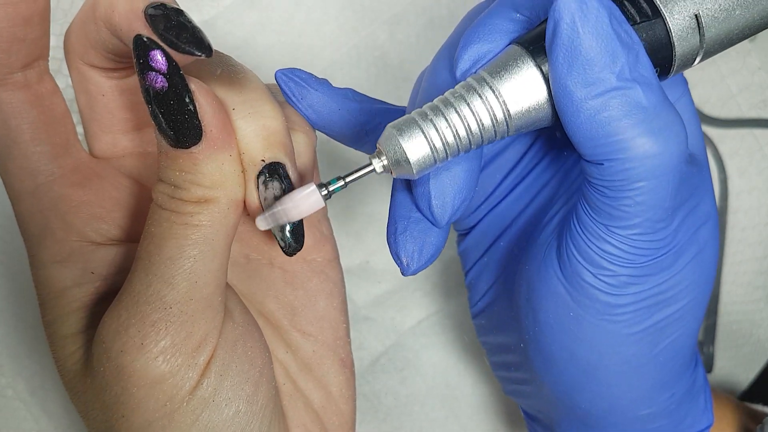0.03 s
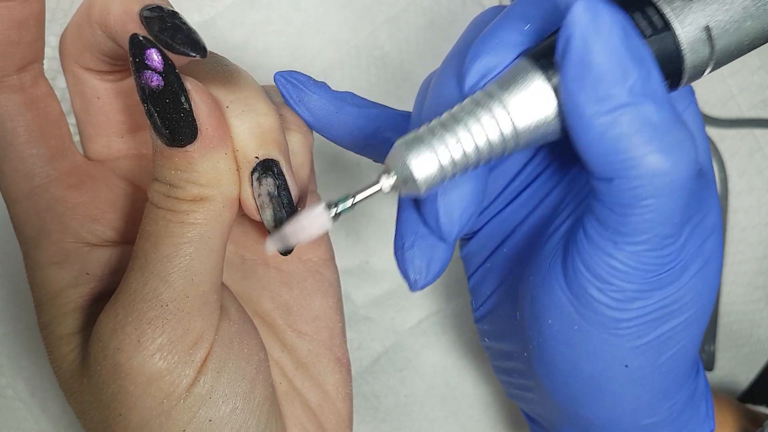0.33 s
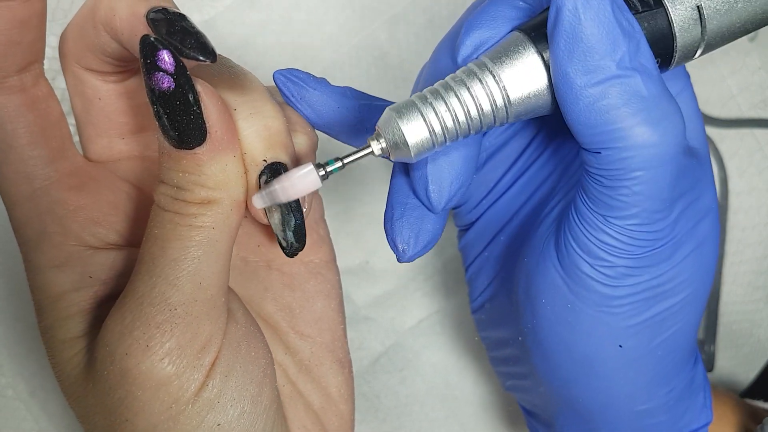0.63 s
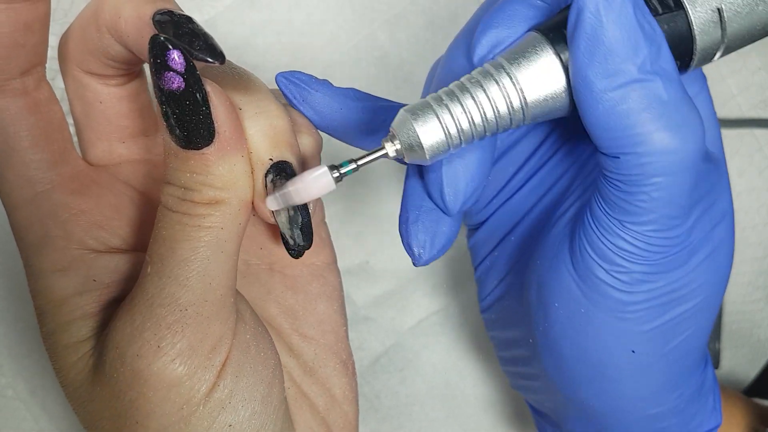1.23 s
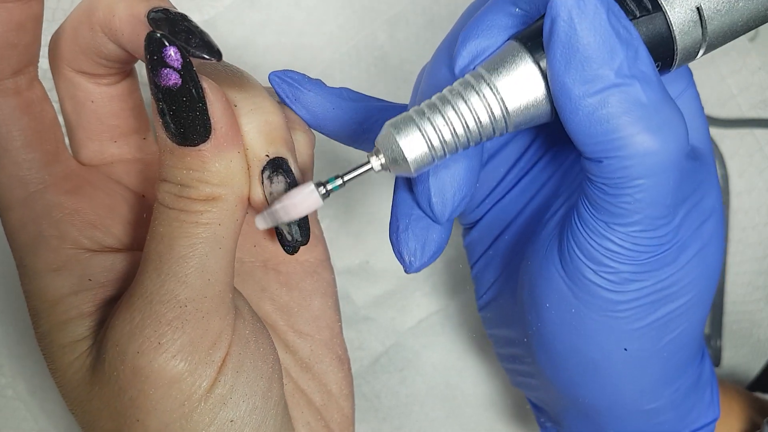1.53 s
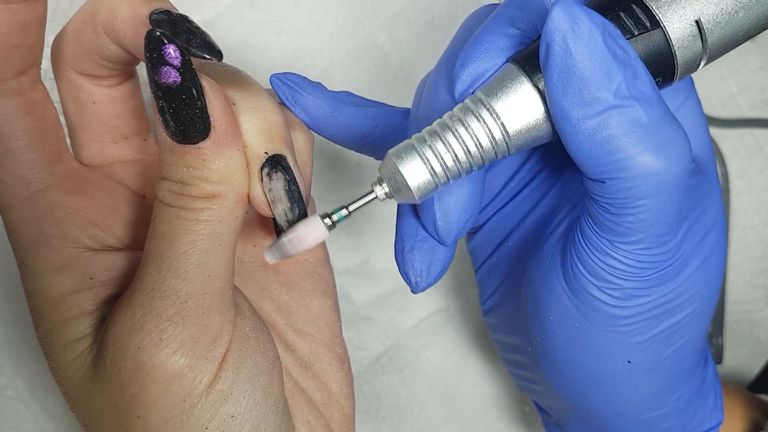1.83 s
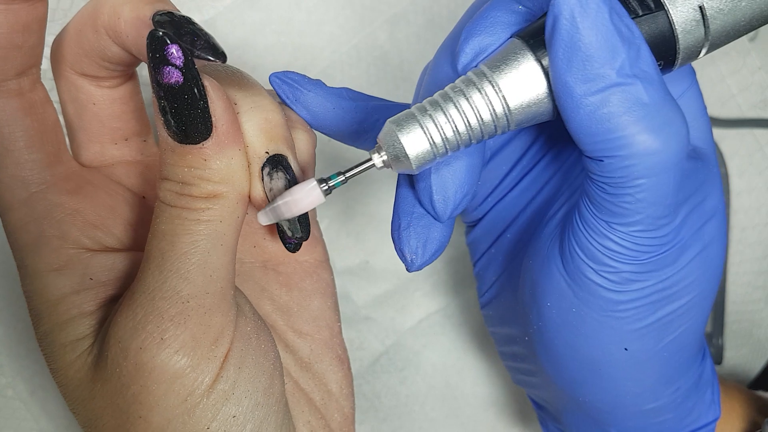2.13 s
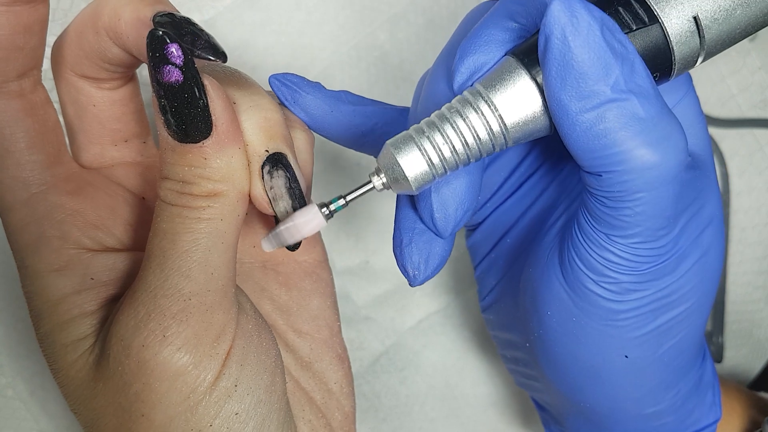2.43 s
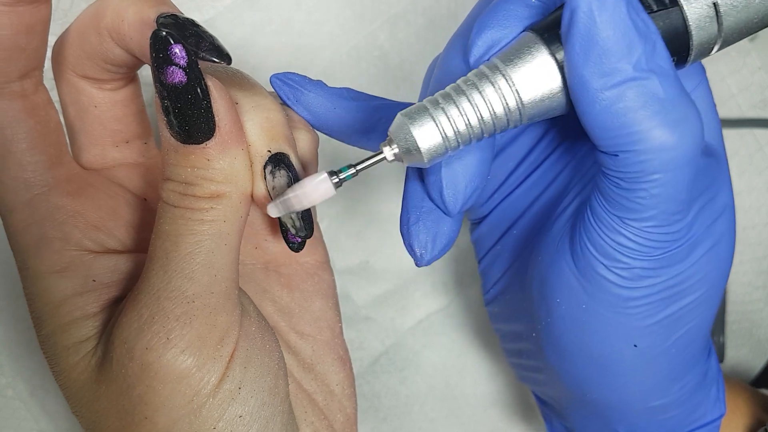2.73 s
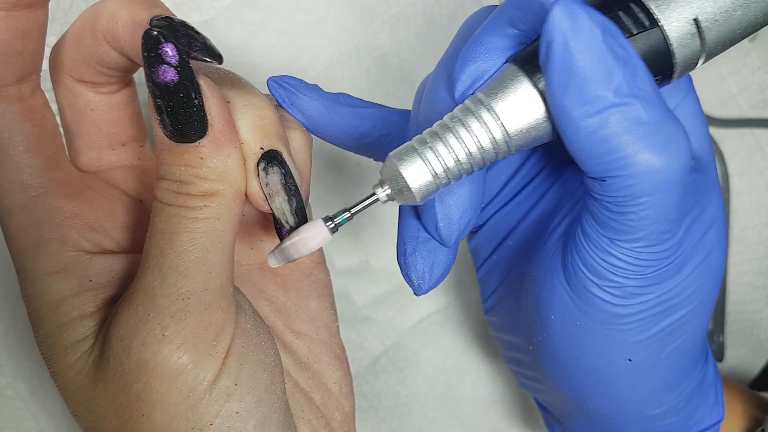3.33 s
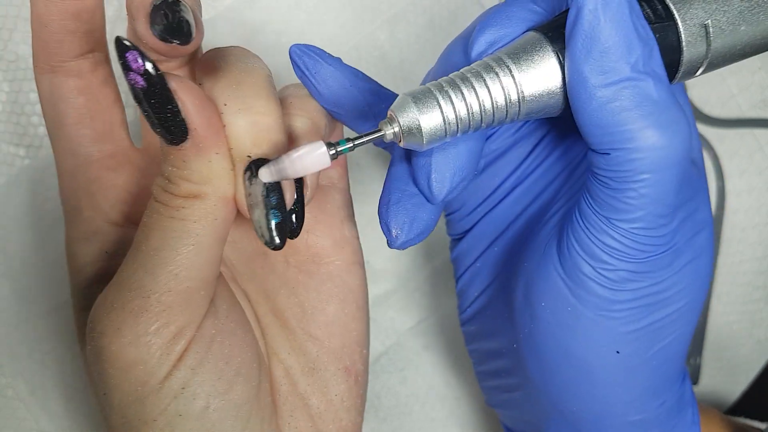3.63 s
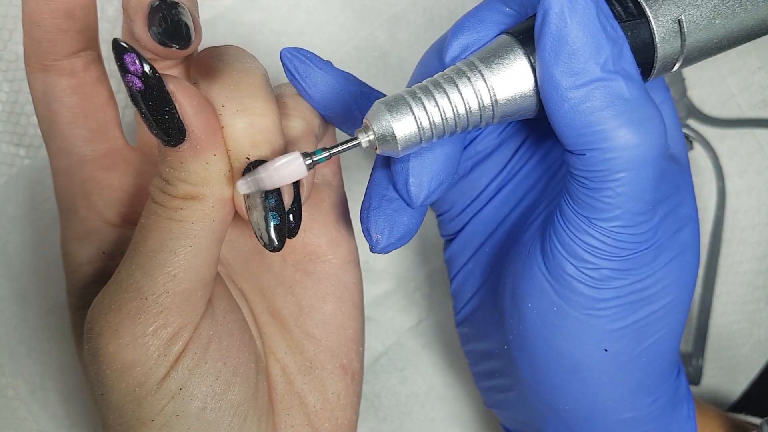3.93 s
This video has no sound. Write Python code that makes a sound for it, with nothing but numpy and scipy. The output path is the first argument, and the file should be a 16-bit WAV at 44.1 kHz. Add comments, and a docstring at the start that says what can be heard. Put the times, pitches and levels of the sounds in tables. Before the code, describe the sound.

An electric nail drill whines close by and grinds a fingernail in five short strokes, rasping, squealing and later screeching. Its pitch sags under each stroke and recovers between them, then it runs free over a faint room rumble.

```python
"""An electric nail drill runs close by, its bit already on a fingernail, over a faint room rumble.
The gritty bit repeats its scratches every turn: it rasps, hisses, catches and squeals as the motor slows.
It lifts at 0.4 s and the motor recovers, its ball bearings whining with it. Four more strokes follow,
slowing it each time; from 1.5 s the nail also screeches. After 3.4 s the drill runs free,
and near 3.85 s the hand turns with a soft rustle."""
import sys
import numpy as np
from scipy import signal
from scipy.fft import rfft, irfft
from scipy.io import wavfile

SR = 44100
rng = np.random.default_rng(int(sys.argv[2]) if len(sys.argv) > 2 else 0)


def wav_record(signal):
    """Record a signal, one row per channel, as 16-bit PCM in the file named by sys.argv[1]."""
    frames = np.transpose(np.atleast_2d(signal))
    bounded = np.clip(frames, -1, 1)
    # unit amplitude maps onto the largest positive 16-bit level
    quanta = np.round(bounded * 32767).astype(np.int16)
    wavfile.write(sys.argv[1], SR, quanta)


N = 176400
T = np.arange(N) / SR


def from_db(db):
    return 10 ** (np.asarray(db) / 20)


def unit_rms(x):
    return x / np.sqrt(np.mean(x ** 2) + 1e-20)


def in_time(rows):
    """Each column after t/s, interpolated to every sample."""
    times_s, *columns = np.transpose(rows)
    return [np.interp(T, times_s, column) for column in columns]


def drift(rate_hz):
    """Smooth random curve, rms 1."""
    step, settle = 40, 2000
    pole = np.exp(-2 * np.pi * rate_hz * step / SR)
    white = rng.standard_normal(N // step + settle + 2)
    slow = signal.lfilter([1], [1, -2 * pole, pole * pole], white)[settle:]
    return np.interp(np.arange(N) / step, np.arange(len(slow)), unit_rms(slow))


def colour(x, curve, lag_s=0, phase=((0, 0), (1, 0))):
    """Filter by a (f/Hz, gain/dB) curve, with optional delay and (f/Hz, phase/rad) curve."""
    hz = np.fft.rfftfreq(N, 1 / SR)
    curve_hz, curve_db = np.transpose(curve)
    gain = from_db(np.interp(np.log(hz + 1), np.log(curve_hz), curve_db))
    phase_rad = np.interp(hz, *np.transpose(phase)) - 2 * np.pi * hz * lag_s
    return irfft(rfft(x) * gain * np.exp(1j * phase_rad), N)


def noise(curve):
    """Coloured noise, rms 1."""
    return unit_rms(colour(rng.standard_normal(N), curve))


def wide_noise(curve):
    """Stereo noise, half its power common to both sides."""
    return unit_rms(noise(curve) + np.array([noise(curve), noise(curve)]))


def band(x, low_hz, high_hz):
    return signal.sosfilt(signal.butter(4, [low_hz, high_hz], "band", fs=SR, output="sos"), x)


def swell(middle_s, half_s):
    """Rounded, flat-topped envelope."""
    return np.exp(-((T - middle_s) / half_s) ** 4)


def gate(start_s, end_s, fade_s=0.03):
    """On-off envelope with linear fades."""
    return np.clip(np.minimum(T - start_s, end_s - T) / fade_s + 0.5, 0, 1)


def tone(turns, order, db, waver_db=2.5):
    """Sine of `order` cycles per turn, wavering in level."""
    amplitude = np.sqrt(2) * from_db(db + waver_db * drift(8.9))
    return amplitude * np.sin(2 * np.pi * (order * turns + rng.random()))


# Room rumble spectrum: f/Hz, relative level/dB
RUMBLE_SPECTRUM = [(20, 6.5), (32, -34), (42, -29), (54, 1), (70, -8), (120, -11.5), (200, -8), (400, -13),
                   (1000, -18)]
# Room rumble envelope: t/s, level/dB
RUMBLE_LEVEL = [(0, -79), (1.0, -71), (1.35, -57.5), (2.5, -57.5), (4, -56.5)]
# Deep rumble spectrum: f/Hz, relative level/dB
DEEP_SPECTRUM = [(18, 14), (30, -19), (42, -4), (70, -43), (150, -48)]


def room(deep_db=-62, fade_db_per_s=5):
    """A faint rumble rises while a deeper one dies away."""
    rumble = from_db(in_time(RUMBLE_LEVEL)[0]) * wide_noise(RUMBLE_SPECTRUM)
    return rumble + from_db(deep_db - fade_db_per_s * T) * noise(DEEP_SPECTRUM)


# Rustle spectrum: f/Hz, relative level/dB
RUSTLE_SPECTRUM = [(40, -19), (120, -1), (300, -5), (600, -2.5), (1200, -2.5), (3000, -19)]


def hand_rustle(level_db=-53):
    """The turning hand: one soft swell of noise."""
    return from_db(level_db) * swell(middle_s=3.85, half_s=0.15) * wide_noise(RUSTLE_SPECTRUM)


# Motor harmonics: shaft order, level/dB
HUM_ORDERS = [(2, -78), (3, -64), (4, -70), (5, -64), (6, -77), (8, -59), (9, -64), (10, -58), (11, -61),
              (12, -59), (13, -55), (14, -55.5), (15, -60), (17, -71), (22, -68), (23, -58), (24, -71),
              (27, -69), (28, -64), (29, -70), (30, -61), (33, -68), (34, -58), (35, -74), (39, -68),
              (45, -72), (55, -73), (56, -67), (62, -74)]


def motor_hum(turns):
    """Harmonics locked to the shaft; levels of unlisted orders are interpolated."""
    orders, levels_db = np.transpose(HUM_ORDERS)
    return sum(tone(turns, order, np.interp(order, orders, levels_db)) for order in range(2, 63))


# Bearing lines: shaft order, relative level/dB
BEARING_ORDERS = [(26.82, -59), (27.66, -65), (28.82, -59), (33.6, -69), (34.48, -56), (39.58, -66),
                  (40.44, -53), (41.3, -59), (46.1, -64), (47.24, -56), (48.1, -60), (52.92, -66),
                  (54.06, -57), (54.92, -61), (59.74, -65), (60.88, -60), (61.74, -59)]
# Handpiece resonances: f/Hz, gain/dB
HOUSING_RESPONSE = [(5000, 3), (7800, 1), (8700, 5), (9500, -21), (10100, -6), (10600, 4.5), (11100, 0.5),
                    (11650, 6.5), (12300, -5.5), (13200, -5), (13900, 2), (15500, 3.5)]
# Chirps as the load comes off: start t/s, end t/s, shaft order, level/dB
UNLOAD_CHIRPS = [(1.93, 2.03, 47.24, -47), (3.38, 3.48, 54.06, -50)]


def bearing_whine(turns, slip_hz=0.198, trim_db=-0.5):
    """Slipping ball bearings: inharmonic lines glide through the housing resonances; two chirp."""
    ball_turns = turns + np.cumsum(slip_hz * drift(16)) / SR
    lines = sum(tone(ball_turns, order, db) for order, db in BEARING_ORDERS)
    chirps = sum(gate(start, end) * tone(ball_turns, order, db) for start, end, order, db in UNLOAD_CHIRPS)
    return from_db(trim_db) * colour(lines, HOUSING_RESPONSE) + chirps


# Brush and bearing hiss: f/Hz, relative level/dB
HISS_SPECTRUM = [(120, -24), (300, -8), (550, -8.5), (900, -3.5), (1300, 4.5), (1550, -3), (2100, -0.5),
                 (3400, 1.5), (3850, -0.5), (4200, -12), (5100, 3), (5900, 0), (6500, -6.5), (7600, 0.5),
                 (8600, -1.5), (9300, -12), (10300, -2), (11200, -3), (13000, -5), (15800, -9.5)]
# Motor, left re right: f/Hz, gain/dB
MOTOR_LEFT_GAIN = [(250, -8.5), (800, -2), (1500, -3.5), (2100, 0.5), (2550, 0), (3050, -10.5), (3600, -8),
                   (4200, -6.5), (5500, -10), (6800, -11.5), (7800, -16.5), (10000, -18), (12000, -8.5),
                   (15500, -14)]
# Whine and hiss as the handpiece moves: t/s, gain/dB
MOTOR_GAIN = [(0, 2), (.55, 0), (1.35, 0), (2, 0.5), (2.8, 0.5), (3.45, 1), (3.65, -0.5), (4, -1)]
# Shaft fundamental: t/s, relative level/dB
SHAFT_LEVEL = [(0.0, -64), (0.51, -78.5), (0.69, -62.5), (0.77, -73), (1.22, -75), (1.48, -58),
               (1.51, -63.5), (2.13, -68), (2.18, -62), (2.63, -69.5), (2.99, -56.5), (3.34, -73),
               (3.6, -58.5), (4.0, -55)]


def motor(turns, hiss_db=-43, shaft_trim_db=-2.5):
    """Hum, bearing whine and brush hiss, mostly on the right; the shaft's own note in the centre."""
    whine = motor_hum(turns) + bearing_whine(turns)
    hiss, left_hiss = (from_db(hiss_db) * noise(HISS_SPECTRUM) for _ in range(2))
    left = colour(whine + (hiss + left_hiss) / np.sqrt(2), MOTOR_LEFT_GAIN, lag_s=0.00031)
    shaft = tone(turns, 1, in_time(SHAFT_LEVEL)[0] + shaft_trim_db, waver_db=2)
    return from_db(in_time(MOTOR_GAIN)[0]) * np.array([left, whine + hiss]) + shaft


def grit(turns, renew_hz=11.4, wander=0.82, fourth_boost_db=8):
    """The bit's random surface, read once a turn; other grains come and go as it slides."""
    orders, points_per_turn = np.arange(68), 2048
    strength = (orders > 1) * from_db(fourth_boost_db * (orders % 4 == 0))
    position = (turns % 1 * points_per_turn).astype(int)

    def surface():
        phases = np.exp(2j * np.pi * rng.random(len(orders)))
        return unit_rms(irfft(strength * phases, points_per_turn))[position]

    lasting = surface()
    passing = unit_rms(sum(surface() * drift(renew_hz) for _ in range(4)))
    return unit_rms(lasting + wander * passing)


# Nail resonances: f/Hz, gain/dB
NAIL_RESPONSE = [(900, -44), (1450, -8.5), (1700, -7), (2000, 4.5), (2300, -4.5), (2800, 0), (4000, -12)]
# Catches: middle t/s, half length/s, level/dB
CATCH_EVENTS = [(0.033, 0.097, -39), (0.232, 0.13, -36), (0.663, 0.0098, -41), (0.815, 0.091, -41),
                (0.929, 0.032, -35.5), (1.008, .03, -36.5), (1.595, 0.018, -37), (1.806, 0.071, -35.5),
                (2.348, 0.1, -38.5), (2.61, 0.012, -35), (3.045, 0.028, -36)]


def catches(turns, noise_ratio=3.7):
    """The bit catches and rattles the nail: rough bursts of the nail's own ring."""
    repeating = unit_rms(colour(grit(turns), NAIL_RESPONSE))
    ring = unit_rms(repeating + noise_ratio * noise(NAIL_RESPONSE))
    return ring * sum(from_db(db) * swell(middle_s, half_s) for middle_s, half_s, db in CATCH_EVENTS)


# Chatter tones: start t/s, end t/s, shaft order, level/dB
SQUEAL_EVENTS = [(.12, .35, 16, -45), (.21, .35, 12, -42), (.28, .35, 8, -37), (.65, .9, 12, -43),
                 (.76, .94, 8, -40), (.9, 1.15, 16, -38), (.9, 1.15, 32, -40), (1.01, 1.14, 12, -38),
                 (1.43, 1.53, 12, -41), (1.52, 1.75, 12, -37.5), (1.535, 1.63, 4, -41),
                 (1.53, 1.66, 8, -29), (1.66, 1.75, 8, -38), (1.73, 1.92, 16, -38), (1.70, 1.91, 32, -30),
                 (1.75, 1.9, 44, -39), (2.21, 2.29, 12, -39), (2.22, 2.39, 8, -37), (2.29, 2.57, 12, -34.5),
                 (2.29, 2.42, 28, -42), (2.46, 2.64, 32, -34), (2.57, 2.64, 12, -39), (2.58, 2.65, 16, -41),
                 (2.93, 3.37, 12, -39), (3.2, 3.37, 32, -40), (3.27, 3.36, 8, -38)]
# Chatter, left re right: shaft order, gain/dB
SQUEAL_LEFT_GAIN = [(4, 0), (8, -7), (12, -4), (16, -1), (28, -1)]


def squeals(turns, rough_db=1.5, rough_hz=90):
    """The bit chatters on the nail at multiples of four cycles a turn; stereo."""
    chatter = 0
    for start_s, end_s, order, db in SQUEAL_EVENTS:
        left_db = np.interp(order, *np.transpose(SQUEAL_LEFT_GAIN))
        sides = from_db([[left_db], [0]])
        chatter = chatter + sides * gate(start_s, end_s) * tone(turns, order, db, waver_db=1.5)
    return chatter * unit_rms(from_db(rough_db * drift(rough_hz)))


# Screeches: start t/s, end t/s, start f/Hz, end f/Hz, level/dB
SCREECH_EVENTS = [(1.53, 1.694, 7580, 7500, -38), (1.74, 1.918, 7580, 7710, -35),
                  (2.264, 2.434, 7500, 7260, -39.5), (2.454, 2.65, 7900, 7610, -33),
                  (2.924, 3.035, 7550, 7520, -38), (3.05, 3.384, 7540, 7450, -34)]


def screeches(turns, force, width_hz=550, noise_ratio=0.31):
    """Scratches ring in a high, narrow nail resonance that shifts as the bit moves."""
    scratches = force * (grit(turns) + noise_ratio * rng.standard_normal(N))
    lowpass = signal.butter(2, width_hz / 2, fs=SR, output="sos")
    total = 0
    for start_s, end_s, start_hz, end_hz, db in SCREECH_EVENTS:
        centre_hz = np.interp(T, [start_s, end_s], [start_hz, end_hz])
        carrier = np.exp(2j * np.pi * np.cumsum(centre_hz) / SR)
        envelope = gate(start_s, end_s)
        # Shift down, low-pass, shift back: a gliding band-pass.
        ring = envelope * np.real(carrier * signal.sosfilt(lowpass, scratches / carrier))
        total = total + from_db(db) * ring * np.sqrt(np.sum(envelope ** 2) / np.sum(ring ** 2))
    return total


def sputter(x, depth_db=1.8, rate_hz=20):
    """The rasp's middle partials come and go, each half octave on its own."""
    edges_hz = (850, 1250, 1750, 2500)
    below = [signal.sosfiltfilt(signal.butter(4, hz, fs=SR, output="sos"), x) for hz in edges_hz]
    half_octaves = np.diff(below, axis=0)
    return x + sum(part * (unit_rms(from_db(depth_db * drift(rate_hz))) - 1) for part in half_octaves)


# Scratch spectrum: f/Hz, relative level/dB
SCRATCH_SPECTRUM = [(300, -34.5), (600, -7), (740, 0), (1000, -2.5), (1250, -2), (1550, 7), (1950, 0.5),
                    (2400, 0), (3000, -0.5), (3500, 9), (3900, -0.5), (4250, 2.5), (4900, -1), (5700, -2),
                    (6400, -4), (7200, 0.5), (7800, 1.5), (8700, -1), (9700, -0.5), (10500, 3.5),
                    (11200, -5.5), (11900, 6), (12700, -22), (13500, 9), (14400, 0.5), (15800, -1.5)]
# Band envelopes, one block per stroke: t/s, then low, mid, high level/dB before trim
RASP_LEVELS = [
    [(0.0, -44, -45, -70), (0.05, -44.5, -51, -54), (0.152, -45, -50.5, -51), (0.32, -45, -42, -31.5),
     (0.342, -49, -52, -31.5), (0.365, -41.5, -45.5, -38.5)],
    [(0.645, -51, -59, -63), (0.653, -37.5, -62, -55), (0.667, -44, -49, -54), (0.945, -43.5, -49, -45.5),
     (0.987, -44, -50, -41), (1.011, -46, -41, -34.5), (1.123, -45.5, -43.5, -31), (1.16, -45.5, -45, -41)],
    [(1.425, -72, -57, -64), (1.433, -39.5, -51.5, -60), (1.471, -43.5, -48, -47),
     (1.613, -36.5, -41, -41.5), (1.701, -47.5, -47.5, -38.5), (1.771, -46, -43.5, -33.5),
     (1.89, -42.5, -50, -32.5), (1.93, -48.5, -41, -36)],
    [(2.205, -42, -50, -43), (2.221, -45.5, -46.5, -46), (2.271, -44.5, -50, -44),
     (2.309, -43.5, -50, -37.5), (2.359, -39.5, -42.5, -34.5), (2.411, -59.5, -50, -38.5),
     (2.631, -43, -45.5, -35.5), (2.65, -44, -61, -40)],
    [(2.925, -77, -61, -54), (2.935, -45, -51.5, -47.5), (3.071, -49, -50, -39), (3.149, -42.5, -44, -36.5),
     (3.161, -45.5, -47.5, -36), (3.35, -47, -48.5, -37), (3.378, -45, -56, -36)],
]


def rasp(turns, force, edges_hz=(200, 2783, 7350, 16900), trim_db=(2.5, 6, 4), loose_db=(-12.5, -1.5, -5)):
    """Repeating and loose scratches in three bands, plus a separate grit pattern for the left side."""
    repeating = sputter(unit_rms(colour(grit(turns) * force, SCRATCH_SPECTRUM)))
    loose = noise(SCRATCH_SPECTRUM) * force
    left_grit = colour(grit(turns), SCRATCH_SPECTRUM)
    common = left_only = 0
    for i, level_db in enumerate(in_time(np.vstack(RASP_LEVELS))):
        low_hz, high_hz = edges_hz[i:i + 2]
        gain = from_db(level_db + trim_db[i])
        scratches = repeating + from_db(loose_db[i]) * loose
        common = common + gain * unit_rms(band(scratches, low_hz, high_hz))
        left_only = left_only + gain * unit_rms(band(left_grit, low_hz, high_hz))
    return common, left_only


# Bit on the nail: start t/s, end t/s
STROKE_TIMES = [(0, 0.365), (.645, 1.157), (1.425, 1.928), (2.205, 2.646), (2.925, 3.372)]


def contact(touch_s=0.004, lift_s=0.011):
    """1 while the bit is on the nail, decaying as it lifts."""
    strokes = []
    for start_s, end_s in STROKE_TIMES:
        touch = np.clip((T - start_s) / touch_s + 0.5, 0, 1)
        lift = np.exp(-np.clip((T - end_s) / lift_s, 0, 20))
        strokes.append(touch * lift)
    return np.max(strokes, axis=0)


# Once-a-turn pressure pulse: t/s, depth/0-1
WOBBLE_DEPTH = [(2.65, .26), (2.95, .55)]
# Grinding, left re right: f/Hz, gain/dB
GRIND_LEFT_GAIN = [(750, -3), (1250, -1), (1700, -3), (2350, 7.5), (3100, -6), (4000, -5.5), (5000, 2.5),
                   (6600, -13), (7300, -3.5), (8000, -42), (9000, -1.5), (9900, -13.5), (11500, -6.5),
                   (13000, -18), (15500, -1)]
# Grinding, left re right: f/Hz, phase/rad
GRIND_LEFT_PHASE = [(0, -0.5), (2070, -2.5), (2330, -5), (2760, -1.5), (3010, -5.5), (3750, -10.5),
                    (3960, -10), (5170, -11), (6030, -11.5), (6550, -21.5), (8100, -20.5), (9040, -33),
                    (10200, -32.5), (11700, -40.5), (13400, -38.5), (14600, -47.5), (15800, -43)]


def grinding(turns, rough_db=1.1, rough_hz=90, left_mix=0.7):
    """The wobbling bit on the nail: rasp, squeals, catches and screeches, gated by contact; stereo."""
    touching = contact()
    wobble = 1 + in_time(WOBBLE_DEPTH)[0] * np.sin(2 * np.pi * turns)
    force = wobble * from_db(rough_db * drift(rough_hz))
    common, left_only = rasp(turns, force)
    squeal_left, squeal_right = squeals(turns)
    common = common + catches(turns) + screeches(turns, force)
    left = touching * ((common + left_mix * left_only) / np.hypot(1, left_mix) + squeal_left)
    right = touching * (common + squeal_right)
    return np.array([colour(left, GRIND_LEFT_GAIN, phase=GRIND_LEFT_PHASE), right])


# Shaft speed, sagging under each stroke: t/s, f/Hz
SHAFT_SPEED = [(0.0, 235.2), (0.18, 231.5), (0.27, 231.9), (0.37, 237.4), (0.45, 246.2), (0.54, 251.6),
               (0.64, 255.7), (0.72, 252.5), (0.8, 247.3), (1.02, 237.6), (1.1, 236.9), (1.17, 241.1),
               (1.25, 248.9), (1.34, 253.4), (1.43, 256.7), (1.5, 252.6), (1.6, 245.3), (1.85, 236.2),
               (1.93, 238.7), (2.0, 246.7), (2.1, 253.1), (2.2, 257.1), (2.3, 252.3), (2.58, 243.0),
               (2.65, 244.5), (2.74, 252.3), (2.83, 256.4), (2.93, 259.2), (3.1, 254.5), (3.29, 250.5),
               (3.38, 252.5), (3.5, 257.7), (3.72, 261.5), (4.0, 262.1)]


def scene(jitter_hz=0.1954):
    """One shaft drives both motor and grinding; room and hand lie behind."""
    speed_hz = in_time(SHAFT_SPEED)[0] + jitter_hz * drift(25)
    turns = np.cumsum(speed_hz) / SR
    return motor(turns) + grinding(turns) + room() + hand_rustle()


def record(dry, cutoff_hz=15900):
    """Steep elliptic low-pass."""
    return signal.sosfilt(signal.ellip(12, 0.1, 80, cutoff_hz, fs=SR, output="sos"), dry)


dry = scene()
out = record(dry)
wav_record(out)
```